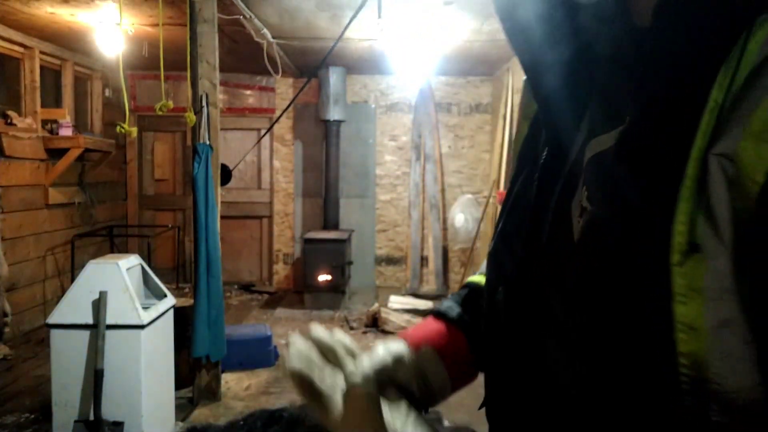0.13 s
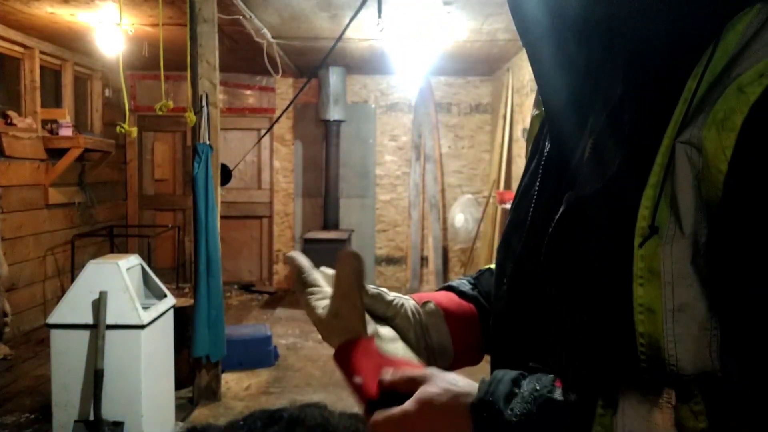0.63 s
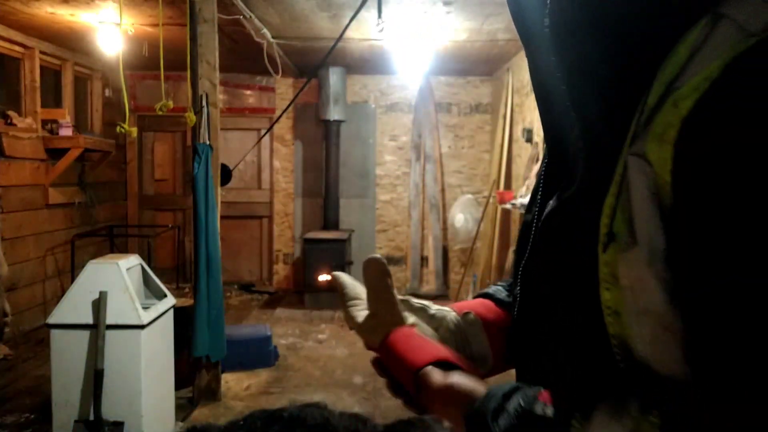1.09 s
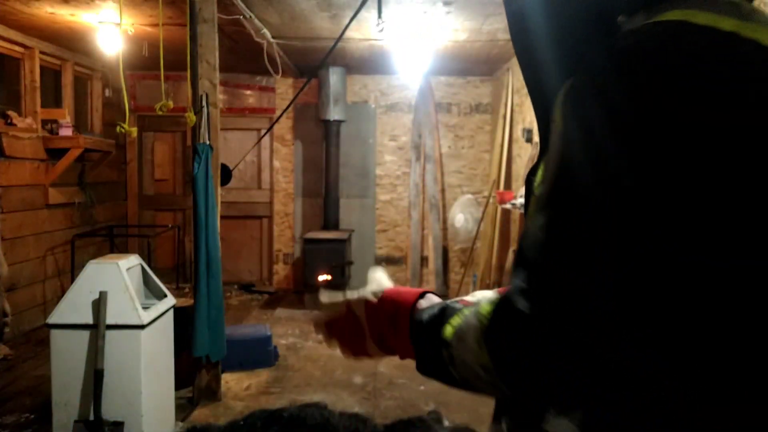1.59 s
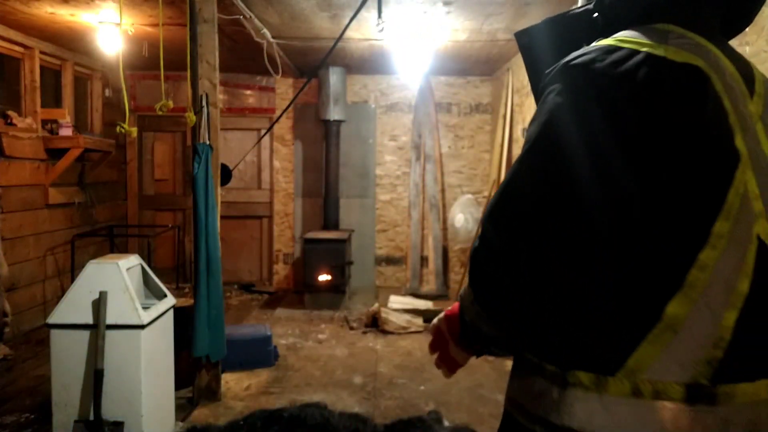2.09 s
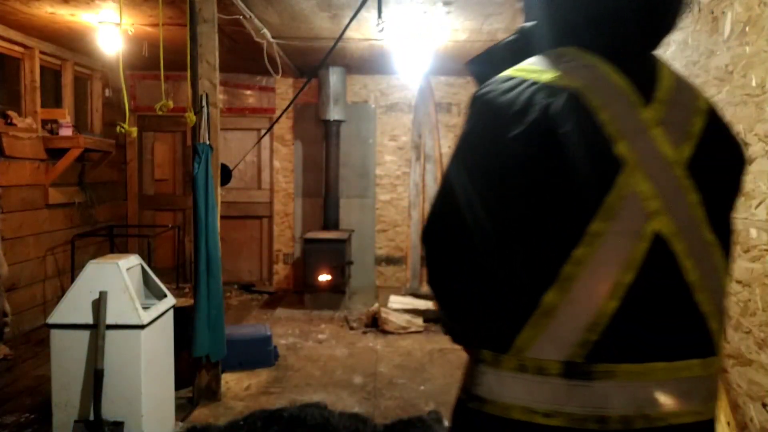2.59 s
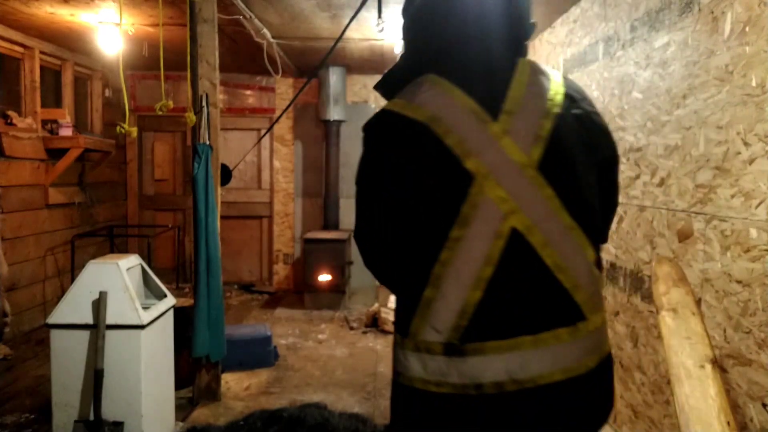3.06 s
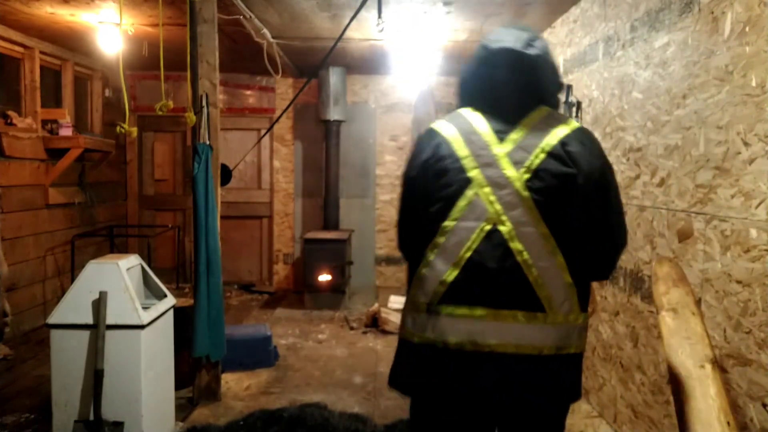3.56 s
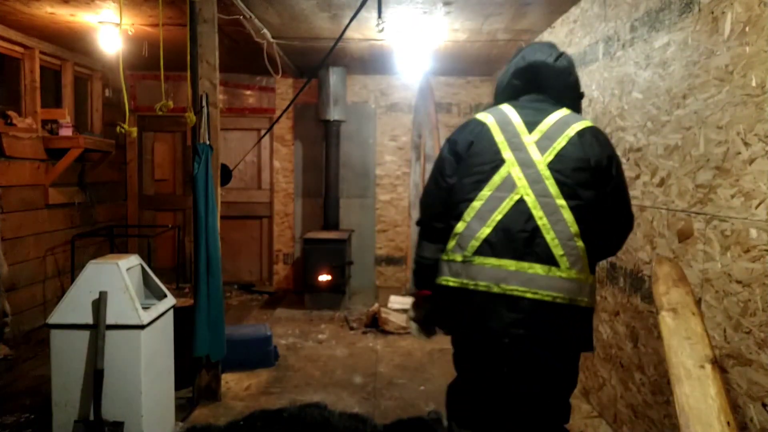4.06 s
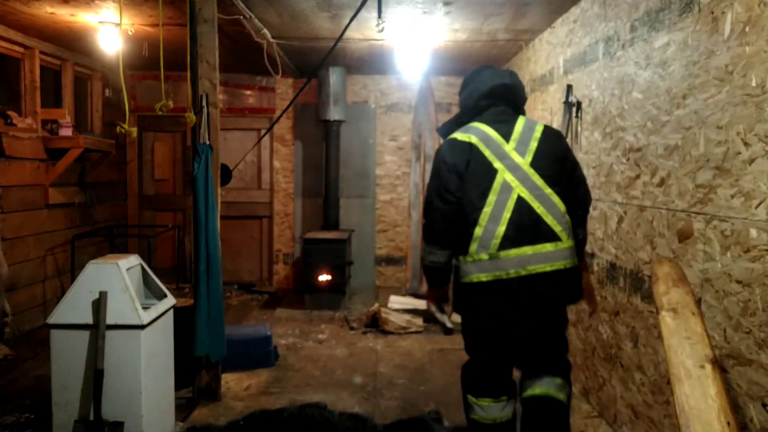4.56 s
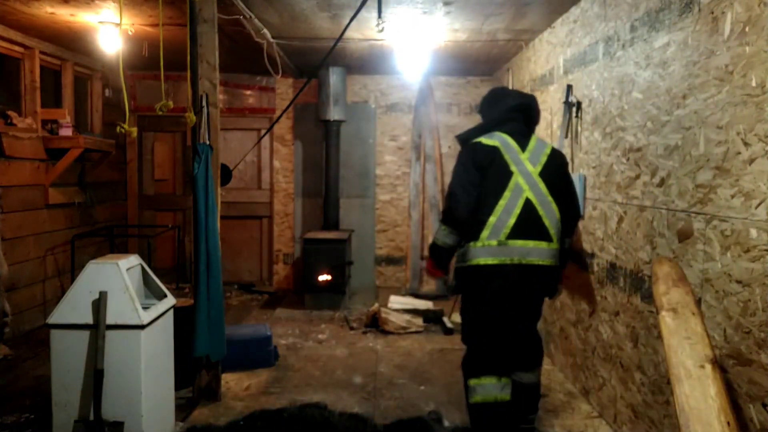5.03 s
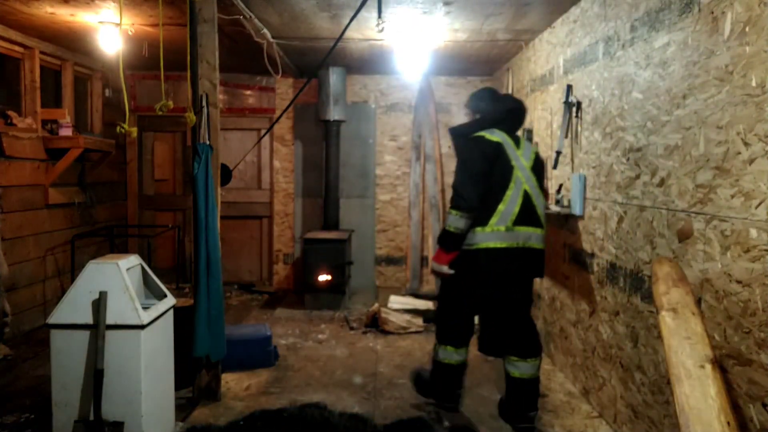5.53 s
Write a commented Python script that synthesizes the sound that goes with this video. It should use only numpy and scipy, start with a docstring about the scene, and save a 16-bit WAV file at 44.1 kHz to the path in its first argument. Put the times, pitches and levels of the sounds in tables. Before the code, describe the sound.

Gloves and sleeves rustle faintly in a quiet wooden shed, then heavy boots turn, scrape and crunch across gritty boards with nylon swishes.

```python
"""A faint low hum and hiss with a light rustle of gloves and sleeves, then heavy boots at work on a gritty
board floor in a small wooden shed, near a camera. Heels thump the boards (noise knocks through floor modes),
soles drag over grit (granular friction noise) and twist (stick-slip), stones tick and then crack (paired
noise bursts), nylon and trouser legs swish (treble friction under stroke envelopes). A diffuse tail of
filtered noise answers the heels and the stones."""
import sys
import numpy as np
from scipy import signal
from scipy.fft import rfft, irfft, next_fast_len
from scipy.io import wavfile
from scipy.ndimage import uniform_filter1d, map_coordinates

SR = 44100
rng = np.random.default_rng(int(sys.argv[2]) if len(sys.argv) > 2 else 0)


def volts(x):
    """Linear amplitude factor 10**(x/20) for a level x in dB, scalar or array-like."""
    e = np.asarray(x, float) / 20
    return 10 ** e


def generate_wav(sig):
    """Save sig (samples, or channels by samples) to the path in sys.argv[1] as 16-bit PCM at SR."""
    pcm = np.round(np.clip(np.atleast_2d(sig).T, -1, 1) * 32767).astype(np.int16)
    wavfile.write(sys.argv[1], SR, pcm)


N = 249473  # length in samples

# resonances of the floor boards: f/Hz, width/Hz, level/dB
BOARD_MODES = [(205, 64, -5.5), (305, 70, 1.5), (349.3, 87, 1.5), (474.6, 88, -1.5), (687, 167, -7)]
# deep resonances of the joists: f/Hz, width/Hz, level/dB
JOIST_MODES = [(86, 50, 2), (152.5, 51, -1.5)]
# spectrum of a sole scraping: f/Hz, relative level/dB
SCRAPE_SPECTRUM = [(200, -46), (400, -12), (800, 0), (1250, -1), (2000, -0.5), (3000, -6.5), (4500, -20.5),
                   (8000, -30.5), (16000, -46)]
# spectrum of fizzing grit: f/Hz, relative level/dB
GRIT_SPECTRUM = [(500, -58), (1500, -10.5), (3000, 3), (4500, 0.5), (6000, -0.5), (8000, -7),
                 (10000, -12.5), (13000, -15.5), (16000, -24)]
# spectrum of nylon rubbing nylon: f/Hz, relative level/dB
NYLON_SPECTRUM = [(2000, -36), (5000, -16), (8000, -10), (10500, -7.5), (12500, -3), (13500, -13),
                  (15000, -6.5), (16000, -4)]


def unit(x):
    """Normalisation to unit rms, so that a later gain sets the level."""
    return x / np.sqrt(np.mean(x ** 2) + 1e-20)


def along(points, hz):
    """Interpolation of (f, value) points on a logarithmic frequency axis."""
    f, v = np.transpose(points)
    return np.interp(np.log(hz + 1), np.log(f + 1), v)


def wobble(rate):
    """Slow random modulation: a smooth curve through rate random knots a second."""
    knots = rng.standard_normal(int(N * rate / SR) + 4)
    return map_coordinates(knots, [np.arange(N) * rate / SR])


def filtered(x, response):
    """Linear filtering: the spectrum of x times a complex response of frequency."""
    m = next_fast_len(x.shape[-1] + 8192)
    return irfft(rfft(x, m) * response(np.fft.rfftfreq(m, 1 / SR)), m)[..., :x.shape[-1]]


def modes(table):
    """Modal superposition: causal second-order resonances with alternating signs."""
    def response(f):
        total = 0
        for k, (centre, width, db) in enumerate(table):
            resonance = 1j * f * width / (centre * centre - f * f + 1j * f * width)
            total = total + (-1) ** k * volts(db) * resonance
        return total
    return response


def paired(two):
    """Interaural coherence: unrelated signals mixed so that mostly the bass is shared; the left leads."""
    # left-right coherence: f/Hz, correlation
    alike = [(60, .98), (180, .96), (400, .75), (800, .4), (2000, .3), (6000, .25), (15000, .25)]
    lead_s = .00012  # the left microphone hears first

    def turn(hz):
        return np.arccos(along(alike, hz)) / 2

    mid, side = filtered(two, lambda hz: np.array([np.cos(turn(hz)), np.sin(turn(hz))]))
    late = np.array([[0], [1]]) * lead_s
    return filtered(np.array([mid + side, mid - side]), lambda hz: np.exp(-2j * np.pi * hz * late))


def patches(two, size, depth_db):
    """Time-frequency modulation by a smoothed random field of gains."""
    z = signal.stft(two, nperseg=size)[2]
    field = uniform_filter1d(rng.standard_normal(z.shape[1:]), size=3, axis=0)
    field = uniform_filter1d(field, size=5, axis=1)
    return signal.istft(z * volts(depth_db * unit(field)), nperseg=size)[1][:, :N]


def friction(response, grains_hz, share, patchy_db, tonal_db, flutter_db, grain_s=0.00083):
    """Granular friction: rattling grains of uneven size in a bed of patchy noise, at rms 1."""
    grains = (rng.random(N) < grains_hz / SR) * rng.random(N)
    burst = signal.lfilter([1], [1, -np.exp(-1 / (grain_s * SR))], grains)
    power = 1 - share + share * unit(burst) ** 2
    two = rng.standard_normal((2, N)) * np.sqrt(power)
    two = patches(two, size=256, depth_db=patchy_db)
    two = patches(two, size=2048, depth_db=tonal_db)  # long windows give brief narrow rings
    return unit(paired(filtered(two, response)) * volts(flutter_db * wobble(35)))


def strokes(s, db, rise, hold, fall):
    """Exponential envelopes summed in power; each slope spans 20 dB in its time plus 2 ms."""
    t = np.arange(N) / SR
    power = 0
    for at, level, r, h, f in zip(*np.broadcast_arrays(s, db, rise + .002, hold, np.abs(fall) + .002)):
        slope = np.maximum((at - t) / r, (t - at - h) / f)
        power = power + volts(level - 20 * np.maximum(0, slope)) ** 2
    return np.sqrt(power)


def shed(x, length):
    """Diffuse reverberation: convolution with fresh noise whose decay rate depends on frequency."""
    # reverberation of the shed: f/Hz, t60/s
    t60 = [(100, 0.12), (500, 0.4), (2000, 0.45), (5000, 0.16), (12000, 0.23)]
    hz, t, z = signal.stft(rng.standard_normal((2, length)), SR, nperseg=128)
    decay = volts(-60 * t / along(t60, hz)[:, None])
    tail = signal.istft(z * decay, SR, nperseg=128)[1][:, :length]
    tail = paired(np.pad(tail, ((0, 0), (80, 0))))  # 80 samples before the first reflection
    return signal.fftconvolve(x, tail / np.linalg.norm(tail[0]), axes=1)


def still():
    """Stationary background noise: hiss of the quiet shed and a narrow-band hum."""
    # spectrum of the quiet shed: f/Hz, relative level/dB
    quiet = [(15, -48), (25, 8.5), (117, -10), (212, -4.5), (439, -13.5), (863, -14), (1330, -40),
             (2350, -53), (3520, -21), (5570, -32.5), (9070, -33), (10100, -33), (16000, -30)]
    # low hum: f/Hz, width/Hz, level/dB
    hum_band = (191, 52, -66)
    hiss = friction(lambda hz: volts(along(quiet, hz)), grains_hz=30, share=.03,
                    patchy_db=1.5, tonal_db=4.0, flutter_db=0.5)
    centre, width, hum_db = hum_band
    band = lambda hz: np.exp(-((hz - centre) / width) ** 2)
    hum = paired(filtered(rng.standard_normal((2, N)), band))
    return volts(-62) * hiss + volts(hum_db) * unit(hum)


def cloth():
    """Fibre friction: nylon swishes and trouser legs brush, as treble noise under stroke envelopes."""
    # nylon swishes: t/s at full level, level/dB, rise/s, hold/s, fall/s
    swishes = [(0.323, -60, 0.73, .01, 0.15), (0.61, -62, 0.13, .01, .08), (0.92, -72, .08, .1, .08),
               (1.316, -52.5, 0.16, 0.047, .2), (1.73, -53, 0.25, .01, .08), (1.82, -58, .06, 0.21, .04),
               (2.49, -69, 0.24, .01, .07), (2.78, -57, 0.024, .15, .05),
               (2.948, -43.5, 0.046, 0.081, 0.08), (3.244, -53, 0.014, .01, .09),
               (3.608, -39, .02, 0.15, .08), (3.996, -47.5, .3, .01, .05), (4.243, -50, 0.052, .01, .2),
               (4.318, -47.5, .08, 0.37, .05), (4.966, -57, .1, .01, .05), (5.07, -49, .03, .1, .05),
               (5.194, -37, .1, 0.0086, 0.031)]
    # trouser legs brush each other: t/s at full level, level/dB, rise/s, hold/s, fall/s
    brushes = [(1.682, -50.5, 0.12, 0.084, .12), (1.86, -52, 0.11, 0.13, 0.055), (2.866, -44, .1, 0.18, .1),
               (3.615, -45.5, .03, .15, 0.09), (3.95, -55.5, 0.12, .05, 0.089),
               (4.304, -51.5, 0.054, 0.32, 0.17), (5.066, -42, 0.031, 0.13, 0.18)]
    # spectrum of trouser cloth: f/Hz, relative level/dB
    trousers = [(3000, -40), (5500, -5), (7000, 0), (8300, -1.5), (10000, -6), (13000, -9), (16000, -18)]
    nylon = friction(lambda hz: volts(along(NYLON_SPECTRUM, hz)), grains_hz=300, share=.15,
                     patchy_db=1.5, tonal_db=.8, flutter_db=1.2)
    legs = friction(lambda hz: volts(along(trousers, hz)), grains_hz=250, share=.2,
                    patchy_db=1.0, tonal_db=3.0, flutter_db=2.0)
    return strokes(*np.transpose(swishes)) * nylon + strokes(*np.transpose(brushes)) * legs


def twist():
    """Stick-slip: the twisting sole slips at an uneven rate and every slip rings the rubber."""
    # rubber sole twisting on the spot: t/s, level/dB
    twist_curve = [(1.6, -75), (1.694, -63), (1.79, -59), (1.814, -44), (1.85, -39.5), (1.94, -41.5),
                   (2.0, -30), (2.03, -59)]
    # ring of each slip: f/Hz, width/Hz, level/dB
    sole_modes = [(1080, 170, 2), (3140, 180, 2), (7900, 2500, -20)]
    slips_per_s = 63 * np.exp(0.23 * wobble(40))
    count = np.cumsum(slips_per_s) / SR
    slips = np.diff(np.floor(count), prepend=0) * volts(1.3 * rng.standard_normal(N))
    rub = rng.standard_normal((2, N)) * signal.lfilter([1], [1, -.992], slips)
    s, db = np.transpose(twist_curve)
    level = volts(np.interp(np.arange(N) / SR, s, db, left=-120, right=-120))
    return unit(paired(filtered(rub, modes(sole_modes)))) * level


def drag_levels():
    """Amplitude envelopes interpolated in dB: gains of the dull scrape and of the fine grit."""
    # gloves and sleeves rustle first, in the same two colours: t/s, dull level/dB, fine level/dB
    rustle = [(0.0, -73, -65.5), (0.118, -64, -61.5), (0.31, -59.5, -55.5), (0.464, -66, -70),
              (0.496, -80, -81), (0.61, -60, -58.5), (0.69, -68.5, -72), (0.862, -77, -94),
              (0.916, -65.5, -68), (1.05, -66.5, -73), (1.126, -73, -85), (1.24, -70.5, -69.5),
              (1.415, -61.5, -60)]
    # soles scrape and fizz over grit, rising and falling through the steps: t/s, scrape level/dB, fizz level/dB
    drags = [
        [(1.46, -54, -65), (1.59, -57, -54), (1.742, -43, -50.5), (1.77, -50, -54), (1.898, -36.5, -45.5),
         (1.966, -38, -42), (1.998, -28, -46), (2.044, -35.5, -75), (2.112, -49.5, -70), (2.15, -65.5, -69.5)],
        [(2.5, -71, -67.5), (2.524, -54, -56), (2.552, -67, -63), (2.58, -42, -40.5), (2.644, -45, -49.5),
         (2.682, -54.5, -57), (2.744, -53, -62.5)],
        [(2.766, -48, -50.5), (2.894, -31, -31), (2.924, -39, -40), (2.948, -26, -27.5), (3.034, -40, -36),
         (3.106, -48, -61), (3.228, -52.5, -61), (3.328, -47, -62), (3.406, -80, -62), (3.492, -59, -60)],
        [(3.576, -56, -52.5), (3.608, -37.5, -32), (3.702, -34.5, -28.5), (3.734, -38, -32.5),
         (3.776, -35.5, -33), (3.838, -43, -52.5), (3.88, -53.5, -55.5), (3.996, -43.5, -53.5),
         (4.05, -50, -57.5)],
        [(4.078, -36.5, -42), (4.17, -44.5, -49), (4.194, -41, -50), (4.214, -39.5, -46)],
        [(4.242, -32, -41), (4.28, -34, -31.5), (4.412, -37, -30), (4.444, -27.5, -21), (4.482, -28.5, -23),
         (4.52, -50, -34), (4.546, -35, -34), (4.598, -44.5, -46.5), (4.676, -43.5, -56.5), (4.736, -59, -63)],
        [(4.96, -68, -61), (5.0, -34, -55.5), (5.064, -42, -34.5), (5.116, -36, -29.5), (5.152, -36.5, -39.5),
         (5.18, -31, -29), (5.262, -39, -38.5), (5.326, -37, -51), (5.43, -61.5, -71), (5.584, -71.5, -71.5),
         (5.638, -68, -64.5)],
    ]
    s, scrape_db, grit_db = np.transpose(np.concatenate([rustle, *drags]))
    t = np.arange(N) / SR
    return volts(np.interp(t, s, scrape_db)), volts(np.interp(t, s, grit_db))


def dragging(drag, grit):
    """Granular friction of soles on grit: a middle-band scrape and a finer, brighter fizz."""
    scrape = friction(lambda hz: volts(along(SCRAPE_SPECTRUM, hz)), grains_hz=174.5, share=0.14,
                      patchy_db=1.5, tonal_db=3.0, flutter_db=1.0)
    fizz = friction(lambda hz: volts(along(GRIT_SPECTRUM, hz)), grains_hz=421, share=0.25,
                    patchy_db=1.36, tonal_db=2.5, flutter_db=1.5, grain_s=.0006)
    return drag * scrape + grit * fizz


def shaken_floor(drag):
    """Forced vibration: drag and shifting weight drive the board and joist modes with noise."""
    # weight comes onto the floor: t/s, board rumble level/dB, joist boom level/dB, fall/s (sign ignored)
    loads = [(1.33, -57, -80, 2), (1.445, -51, -45, 0.18), (1.742, -65, -58, 0.4), (2.33, -63, -68, .1),
             (2.685, -48, -42, 0.13), (2.894, -60, -44.5, -1.24), (2.948, -42, -64, 0.5),
             (3.533, -34.5, -29, 0.17), (3.632, -44, -55, 1.1), (3.72, -53, -34, 0.19),
             (4.275, -39, -43.5, 0.42), (4.32, -43, -55, 0.46), (4.46, -40, -34.5, .09),
             (4.546, -41.5, -48, 0.23), (4.992, -30, -29.5, 0.19), (5.064, -37, -43, 0.24),
             (5.149, -29.5, -26, 0.1462), (5.262, -54, -53, 0.2)]
    rise_s = 0.0083  # before the 2 ms that strokes adds
    rumble = friction(modes(BOARD_MODES), grains_hz=60, share=.12,
                      patchy_db=.8, tonal_db=1.5, flutter_db=1.2)
    boom = friction(modes(JOIST_MODES), grains_hz=25, share=0.3,
                    patchy_db=1.5, tonal_db=1.5, flutter_db=1.2)
    at, board_db, joist_db, fall = np.transpose(loads)
    # the drag shakes the floor at a fixed level under the scrape
    boards = np.hypot(volts(-8) * drag, strokes(at, board_db, rise_s, 0, fall))
    joists = np.hypot(volts(-23) * drag, strokes(at, joist_db, rise_s, 0, fall))
    return boards * rumble + joists * boom


def cracks():
    """Brittle fracture: a stone ticks under the sole, splits louder and brighter, and the shed rings on."""
    # stones cracking: t/s, level/dB, body level/dB, left-right level/dB
    stones = [(1.678, -30, -6.5, 3), (1.805, -39, 6, -3), (1.8567, -32.5, -25, 7), (1.9083, -31, 0.5, 9),
              (1.964, -30, 3.5, 5), (1.9851, -31.5, 5, 6), (2.5252, -45.5, -1, 6),
              (2.5613, -18.5, -7.5, 1.5), (2.762, -32.5, -26, 3), (2.8791, -23, 3, -1),
              (2.943, -22.5, -4, -9), (2.9675, -22, -2.5, -7), (3.1697, -47.5, 10.5, -3),
              (3.2391, -30, -3, 1), (3.2893, -31, -3.5, 1), (3.471, -40.5, -7, -2),
              (3.5059, -32.5, -34, 0.5), (3.6866, -16.5, -13, 8), (4.0596, -22.5, 3, 1),
              (4.1442, -34, 0, 7), (4.1852, -31.5, 2.5, 4), (4.2224, -17, 1.5, 4), (4.268, -19.5, 0, 1),
              (4.4428, -11.5, -5.5, 2), (4.4704, -10.5, -12, 0), (4.8222, -43, -21, 2),
              (4.943, -37, -18, -3), (4.9848, -31.5, 4, 2), (5.0653, -16.5, -38, 1),
              (5.1616, -14.5, -36, 0), (5.221, -26, -32, -19.5), (5.25, -30.5, -19.5, 10),
              (5.2866, -20.5, -39, -1)]
    # the split after the first tick: delay/s, level/dB over the tick before its treble is dulled
    split_after = (0.0071, 5.4)
    delay_s, split_db = split_after
    out, t = np.zeros((2, N + SR)), np.arange(SR // 40) / SR
    give = t / .0009 * np.exp(1 - t / .0009)
    burst = np.exp(-.5 * ((t - delay_s - .0005) / .0013) ** 2)
    dull = lambda hz: 1 / (1 + 1j * hz / 10000) ** 2  # two-pole low-pass on the tick
    for s, db, body_db, pan_db in stones:
        noise = rng.standard_normal((3, 2, len(t))) * np.array([give, burst, give])[:, None]
        tick, split, spread = (unit(paired(v)) for v in noise)

        def colour(hz):
            grit = volts(along(GRIT_SPECTRUM, hz) - 18.0)
            hiss = volts(along(NYLON_SPECTRUM, hz) - 33.5)  # extra top treble
            body = volts(along(SCRAPE_SPECTRUM, hz) + body_db - 9)
            return grit + hiss + body

        pan = np.array([[pan_db], [-pan_db]]) / 2
        snap = filtered(filtered(tick, dull) + volts(split_db) * split, colour) * volts(db + pan)
        wet = volts(5.0) * shed(volts(db) * filtered(spread, colour), length=SR // 3)
        start = round(s * SR)
        out[:, start:start + len(t)] += snap
        out[:, start:start + wet.shape[1]] += wet
    return out[:, :N]


def heels():
    """Impact excitation: a push of weight rings the joists, the tread rolling down knocks the boards."""
    # heel landings: t/s, knock peak level/dB, roll-down time/s, knock softness/ms, weight level/dB over knocks
    landings = [(1.435, -31, 0.032, 0.67, 1), (2.671, -40.5, 0.053, 0.82, -24),
                (2.934, -41, 0.034, 0.19, 10), (3.526, -21.5, 0.04, 0.4, 0), (3.723, -25, 0.034, 0.17, -15),
                (4.262, -30.5, 0.056, 0.28, -12), (4.531, -28, 0.04, 0.22, -28),
                (4.981, -16.5, 0.053, 0.23, -10), (5.151, -25, 0.047, 0.27, -20)]
    out, t = np.zeros((2, N + SR)), np.arange(SR // 4) / SR
    push = -filtered(t / .0015 * np.exp(-t / 0.0017), modes(JOIST_MODES))
    push = push / np.abs(push).max()
    for s, db, roll, soft_ms, weight_db in landings:
        force = (1 - np.exp(-t / 0.00067)) * np.exp(-(t / roll) ** 2)
        knocks = paired(rng.standard_normal((2, len(t)))) * force
        soft = lambda f: (1 + 2j * np.pi * f * soft_ms / 1000) ** -3  # rubber spreads each knock in time
        knocks = filtered(knocks, lambda f: modes(BOARD_MODES)(f) * soft(f))
        thump = volts(db) * (knocks / np.abs(knocks).max() + volts(weight_db) * push)
        wet = volts(-5.5) * shed(thump, length=SR // 3)
        start = round(s * SR)
        out[:, start:start + len(t)] += thump
        out[:, start:start + wet.shape[1]] += wet
    return out[:, :N]


def scene():
    """Linear superposition of all sources at the camera."""
    drag, grit = drag_levels()
    floor = dragging(drag, grit) + shaken_floor(drag)
    return still() + cloth() + twist() + floor + cracks() + heels()


def low_pass(x):
    """Removes everything above the highest recorded frequency."""
    return signal.sosfilt(signal.butter(12, 16640, fs=SR, output="sos"), x)


def record(dry):
    """Linear colouring: the camera body shapes both microphones, each a little differently, and cuts deep bass."""
    # colour of the camera body: f/Hz, width/Hz, level/dB
    casing = [(1155, 380, 2.5), (3130, 100, 1.5), (5630, 470, -2.5), (5680, 67, -2), (8590, 2300, 4.5)]
    # balance of the microphones: f/Hz, left-right level/dB
    lean = [(60, -3.5), (130, 2), (290, -1), (640, 1.5), (1410, -6), (3100, 0.5), (6820, -1.0),
            (15000, -1.5)]
    low_cut_hz, top_hz = 52, 15950

    def response(hz):
        body_db = sum(db * np.exp(-((hz - c) / w) ** 2) for c, w, db in casing)
        lean_db = along(lean, hz) * np.array([[.5], [-.5]])
        cut = (1j * hz / (low_cut_hz + 1j * hz)) ** 3 * (hz < top_hz)
        return volts(body_db + lean_db) * cut

    return low_pass(filtered(dry, response))


dry = scene()
out = record(dry)
generate_wav(out)
```